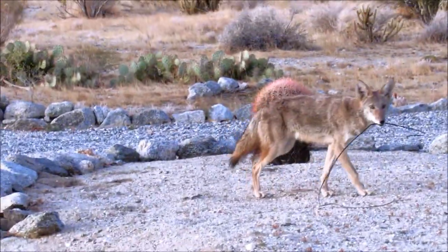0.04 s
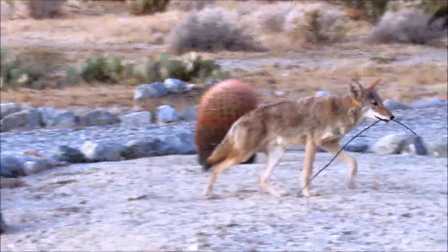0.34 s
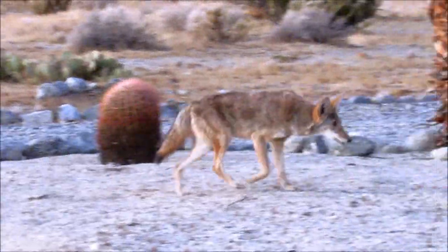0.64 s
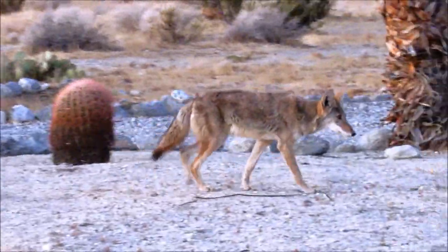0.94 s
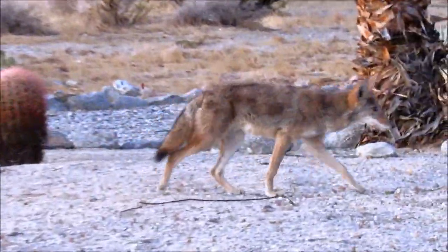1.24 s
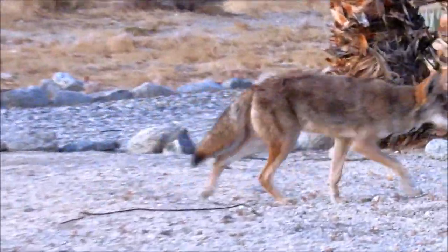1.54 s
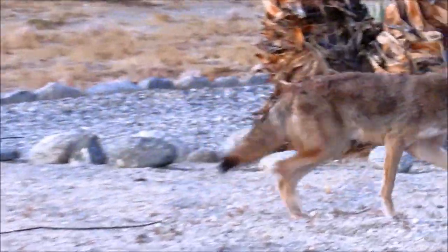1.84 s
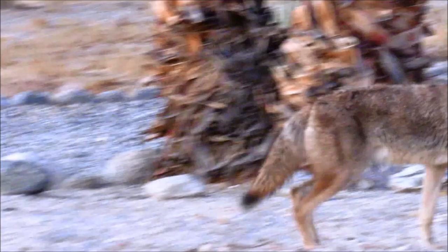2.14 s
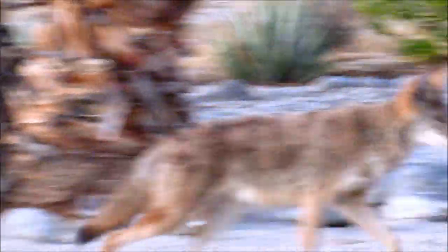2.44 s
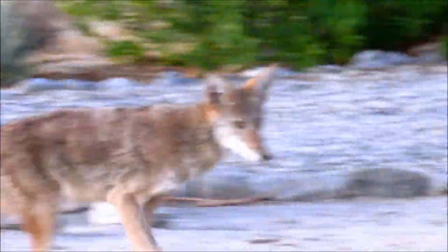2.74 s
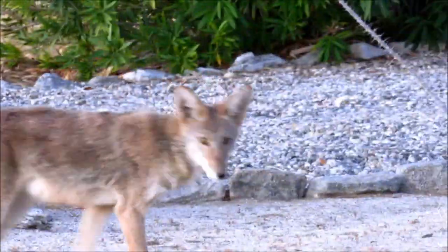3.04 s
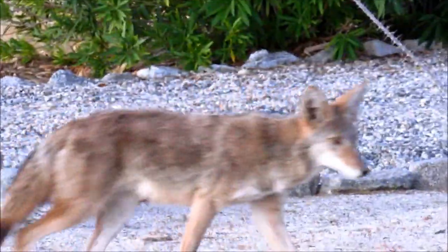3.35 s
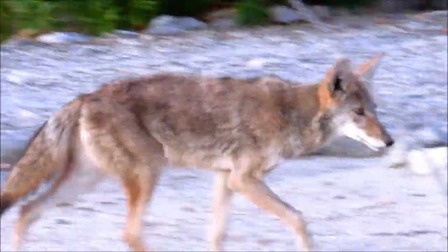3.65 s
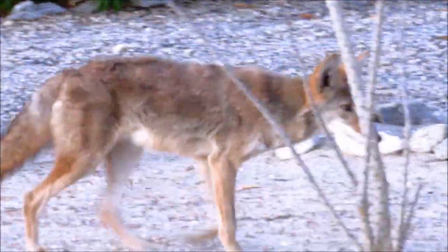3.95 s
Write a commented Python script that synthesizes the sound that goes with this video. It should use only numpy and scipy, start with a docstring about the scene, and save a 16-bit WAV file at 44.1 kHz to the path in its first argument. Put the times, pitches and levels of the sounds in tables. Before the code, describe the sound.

Low gusts of wind hit the microphone in the open air, above a faint far hum. The camera's zoom lever clicks twice and the lens motor buzzes softly for a moment, as the wind builds into heavier, thumping buffets.

```python
"""Outdoors, gusts rumble on a camera's microphone over a faint distant drone, soft rustle and hiss.
Fingers scuff the camera, the zoom lever clicks and rings the plastic casing, and the background dips
briefly. The lens motor rasps into life and whirrs for a second and a half: buzzing gears, a gritty
sliding barrel and a ticking drive. The wind picks up and thumps the microphone, over a faint far hum."""
import sys
import numpy as np
from scipy import signal
from scipy.fft import rfft, irfft
from scipy.io import wavfile
from scipy.ndimage import uniform_filter1d

SR = 44100
rng = np.random.default_rng(int(sys.argv[2]) if len(sys.argv) > 2 else 0)


def unload_audio(sound):
    """Save the sound as a 16-bit wav file, at the path given as the first command line argument."""
    columns = np.transpose(np.atleast_2d(sound))
    # keep every value between -1 and 1, then stretch to whole-number steps
    steps = np.round(np.clip(columns, -1, 1) * 32767)
    wavfile.write(sys.argv[1], SR, steps.astype(np.int16))


N = 176400
T = np.arange(N) / SR
HZ = np.fft.rfftfreq(N, 1 / SR)

# The ride of the gusts. Each row: time in seconds, level in dB.
GUST_LEVEL = [(0.0, -44.5), (0.31, -34.5), (0.46, -43), (0.5, -26.5), (0.57, -48.5), (0.65, -25),
              (0.7, -37), (1.11, -38.5), (1.15, -22), (1.26, -37), (1.45, -28), (1.5, -18.5), (1.64, -29.5),
              (1.85, -24.5), (1.99, -31.5), (2.04, -24), (2.41, -28.5), (2.46, -11.5), (2.53, -23.5),
              (2.7, -25), (2.81, -14), (3.07, -20), (3.99, -19.5)]
# Rumble colour in light and in strong wind. Each row: frequency in Hz, relative level in dB.
LIGHT_RUMBLE = [(28, -6), (65, 9.5), (120, 0), (170, -10), (250, -19.5), (400, -43), (900, -68)]
STRONG_RUMBLE = [(30, -17), (65, -0.5), (115, 2.5), (170, -6), (300, -22.5), (430, -40), (700, -70),
                 (3000, -105)]
# Hard thumps of wind. Each row: centre in seconds, peak in dB, width in seconds.
BUFFETS = [(1.496, -14, .0021), (1.827, -21, 0.0022), (1.868, -21.5, 0.0017), (2.035, -13.5, 0.0025),
           (2.179, -17, 0.0018), (2.461, -15, 0.0024), (2.484, -9.5, .0016), (2.502, -10.5, .0011),
           (2.791, -5, 0.0021), (2.839, -11.5, 0.0016), (2.861, -11.5, .0016), (2.914, -12.5, 0.0014),
           (3.021, -7, 0.0018), (3.115, -9, 0.0017), (3.171, -3.5, 0.0023), (3.241, -13.5, 0.0018),
           (3.293, -3.5, .0015), (3.403, -12.5, 0.0019), (3.485, -11, 0.0014), (3.527, -9, 0.0017),
           (3.583, -4.5, .0016), (3.687, -7.5, 0.0013), (3.716, -12, 0.0013), (3.758, -17, 0.001),
           (3.887, -9, 0.0012), (3.903, -9, 0.0014), (3.972, -6.5, 0.0014)]

# Colours of the background beds. Each row: frequency in Hz, density in dB per Hz before any fader.
AIR_COLOUR = [(100, -82.5), (400, -77), (620, -85), (1000, -92.5), (1400, -96.5), (2000, -108),
              (5000, -120)]
DRONE_COLOUR = [(320, -105), (390, -90), (432, -75.5), (488, -76.5), (550, -89.5), (680, -110)]
RUSTLE_COLOUR = [(600, -115), (1800, -106), (5000, -111), (12000, -122)]
HISS_COLOUR = [(5000, -112), (8000, -107.5), (12500, -107.5), (15000, -112)]
# Stereo image of the air. Each row: frequency in Hz, left-right correlation from -1 to 1.
AIR_IMAGE = [(300, -0.67), (1000, -0.49), (2500, -0.29)]

# Fingers on the casing. Each row: start in seconds, gain in dB.
SCUFFS = [(.706, 3), (.998, -3), (3.292, 0), (3.789, 0)]
# Lever clicks. Each row: start in seconds, level in dB, pitch ratio, tilt in dB per octave.
CLICKS = [(.8675, -43.5, .91, 3), (.9670, -35.5, 1, -.5)]
# Resonances of the casing. Each row: frequency in Hz, bandwidth in Hz, relative level in dB.
CASING_MODES = [(2270, 300, 0), (3100, 350, -12), (4000, 450, -13), (4870, 280, -14.5), (7000, 700, -22)]
# Colours of the camera's noises. Each row: frequency in Hz, density in dB per Hz before any fader.
SCUFF_COLOUR = [(3500, -95), (9000, -106)]
RASP_COLOUR = [(300, -74.5), (700, -80), (1700, -86), (2600, -80), (3500, -95.5), (12000, -106)]
GEAR_LEFT = [(1200, -92.5), (2000, -104), (2450, -97.5), (3000, -94.5), (3500, -102.5), (4550, -109),
             (4870, -94), (5300, -122)]
GEAR_RIGHT = [(1200, -90.5), (2200, -104), (2460, -89), (2700, -100), (3000, -96.5), (3500, -105),
              (4500, -107), (5300, -122)]
BARREL_LEFT = [(5300, -125), (6200, -107), (7800, -104), (8700, -99.5), (9800, -106), (14000, -105),
               (14600, -125)]
BARREL_RIGHT = [(5300, -122), (6200, -104), (7700, -99), (8950, -87), (9450, -93), (9950, -91),
                (11100, -100.5), (12600, -100.5), (14100, -104), (14600, -125)]

# Faders for the rustle, the motor's rasp and the barrel's rub. Each row: time in seconds, gain in dB.
RUSTLE_FADER = [(0, -11), (.5, -3.5), (.9, 4), (2.6, -22), (3.8, 0.5)]
RASP_FADER = [(1.016, -8), (1.038, -3.5), (1.049, 1.5), (1.08, -21)]
BARREL_FADER = [(1.36, 1), (2.06, 1.5), (2.4, -1)]

ZOOM_ON_S, ZOOM_OFF_S = 1.016, 2.603
CYCLE_HZ, FIRST_TICK_S = 19.99, 1.0575  # the rhythm of the lens drive


def amp(db):
    """Decibels to gain."""
    return 10 ** (np.asarray(db) / 20)


def unit(x):
    """Scales to rms 1."""
    return x / np.sqrt(np.mean(x ** 2) + 1e-20)


def curve(points):
    """An automation line through (time, value) points."""
    return np.interp(T, *np.transpose(points))


def spectrum(points):
    """An EQ-style curve through (frequency, value) points on a log-frequency axis."""
    hz, value = np.transpose(points)
    return np.interp(np.log(HZ + 1), np.log(hz), value)


def colour(noise, points):
    """Gives white noise the table's density, rolling off past its ends."""
    low_cut = HZ ** 2 / (HZ ** 2 + (points[0][0] / 2) ** 2)
    high_cut = 1 / (1 + (HZ / points[-1][0] / 1.2) ** 8)
    return irfft(rfft(noise) * amp(spectrum(points)) * low_cut * high_cut, N) * np.sqrt(SR / 2)


def stereo_noise(correlation):
    """White noise whose left-right correlation is one number or a curve over frequency."""
    left, other = rfft(rng.standard_normal((2, N)))
    right = correlation * left + np.sqrt(1 - correlation ** 2) * other
    return irfft(np.array([left, right]), N)


def wander(rate_hz):
    """Random modulation of rms 1, moving at up to about the given rate."""
    return unit(irfft(rfft(rng.standard_normal(N)) / (1 + (HZ / rate_hz) ** 4), N))


def eddies(level_db):
    """Turbulent rumble that brightens as the wind strengthens; the bright part comes in lumps."""
    calm_db, strong_db = -25.5, -9
    strength = np.clip((level_db - calm_db) / (strong_db - calm_db), 0, 1)
    dark = unit(colour(rng.standard_normal(N), LIGHT_RUMBLE))
    bright = unit(colour(rng.standard_normal(N), STRONG_RUMBLE)) * amp(2 * wander(rate_hz=26))
    rumble = np.sqrt(1 - strength) * dark + np.sqrt(strength) * bright
    power = uniform_filter1d(uniform_filter1d(rumble ** 2, size=1500), size=1500)
    levelled = rumble / np.sqrt(power)
    return levelled * amp(level_db + 2 * wander(rate_hz=25.3))


def gusts():
    """Wind on the microphone pushes the two channels mostly in opposite directions."""
    level_db = curve(GUST_LEVEL)
    side = eddies(level_db)
    mid = amp(-13) * eddies(level_db)
    return np.array([mid + side, mid - side])


def distant_air():
    """A wide, dull wash with a fluttering level."""
    return colour(stereo_noise(spectrum(AIR_IMAGE)), AIR_COLOUR) * amp(2.3 * wander(rate_hz=24))


def distant_drone():
    """A narrow band of low-mid noise that sinks about a second in."""
    fader_db = np.interp(T, [.93, 1.02, 4], [0, -6, -9])
    return colour(stereo_noise(.37), DRONE_COLOUR) * amp(fader_db)


def rustle():
    """Soft, finely grained treble that swells and recedes."""
    fader_db = curve(RUSTLE_FADER) + .5 * wander(rate_hz=120)
    return colour(stereo_noise(.4), RUSTLE_COLOUR) * amp(fader_db)


def self_noise(whine_hz=12767, whine_db=-97):
    """The microphone's steady hiss and the camera's thin whine."""
    whine = amp(whine_db) * np.sin(2 * np.pi * whine_hz * T)
    return colour(stereo_noise(0), HISS_COLOUR) + whine


def finger_scuffs(t60_s=.067):
    """Fingers shift on the casing: faint, dry, broad ticks."""
    touch = sum((T > start) * amp(db - 60 * np.maximum(T - start, 0) / t60_s) for start, db in SCUFFS)
    return colour(stereo_noise(0), SCUFF_COLOUR) * touch


def lever_clicks(attack_s=.0007, hold_s=.0032, t60_s=.014, ring_share=.35):
    """The lever scrapes home for a few milliseconds and rings the plastic casing, which dies at once."""
    out = np.zeros((2, N))
    for start, db, pitch, tilt_db in CLICKS:
        age = np.maximum(T - start, 0)
        envelope = np.minimum(age / attack_s, 1) * amp(db - 60 * np.maximum(age - hold_s, 0) / t60_s)
        modes = [(hz * pitch, width, amp(level + tilt_db * np.log2(hz)))
                 for hz, width, level in CASING_MODES]
        body_power = sum(abs(gain * width * HZ / (hz ** 2 - HZ ** 2 + 1j * width * HZ)) ** 2
                         for hz, width, gain in modes)
        scrape = unit(irfft(rfft(stereo_noise(0)) * np.sqrt(body_power), N))
        ring = unit(sum(gain * np.sin(2 * np.pi * (hz * T + rng.random())) for hz, _, gain in modes))
        out += (np.sqrt(ring_share) * ring + np.sqrt(1 - ring_share) * scrape) * envelope
    return out


def brief_dip(from_s=.947, depth_db=-9.5):
    """A gain that ducks around the second click and comes back as the motor starts."""
    ducked = (T > from_s) & (T < ZOOM_ON_S)
    return uniform_filter1d(amp(depth_db * ducked), size=60)


def motor_rasp():
    """The gears rasp as they take up their slack."""
    starting = (T > ZOOM_ON_S) & (T < RASP_FADER[-1][0])
    return colour(stereo_noise(.46), RASP_COLOUR) * amp(curve(RASP_FADER)) * starting


def gear_buzz(teeth, throb):
    """Midrange gear noise pulsing with the teeth, coloured differently on each side."""
    left, right = stereo_noise(.13) * (1 + .21 * teeth + .16 * throb) * amp(wander(rate_hz=25))
    return np.array([colour(left, GEAR_LEFT), colour(right, GEAR_RIGHT)])


def barrel_slide(teeth, throb, peak_specks_per_s=17):
    """The lens barrel rubs with a bright hiss and catches on more grit towards the end of its travel."""
    rub = stereo_noise(.47) * (1 + .21 * throb + .17 * teeth)
    rub *= amp(curve(BARREL_FADER) + .8 * wander(rate_hz=17) + 2 * wander(rate_hz=100))
    travel = (T - ZOOM_ON_S) / (ZOOM_OFF_S - ZOOM_ON_S)
    grit = amp(23.5) * rng.standard_normal((2, N))
    catches = rng.random(N) < travel * peak_specks_per_s / SR
    left, right = rub + grit * catches
    return np.array([colour(left, BARREL_LEFT), colour(right, BARREL_RIGHT)])


def drive_ticks(gap_s=.0167, jitter_s=.00015, ring_hz=12550, width_hz=510):
    """The drive knocks twice a cycle, each knock a tiny high ping far to the right."""
    cycles = np.arange(FIRST_TICK_S, ZOOM_OFF_S, 1 / CYCLE_HZ)
    times = (cycles[:, None] + [0, gap_s]).ravel()
    times += jitter_s * rng.standard_normal(len(times))
    knocks = np.zeros(N)
    knocks[(times * SR).astype(int)] = 1
    knocks *= amp(-41.5 + .5 * rng.standard_normal(N))
    age = T[:SR // 100]
    envelope = (1 - np.exp(-age / .0001)) * np.exp(-np.pi * width_hz * age)
    ping = envelope * np.sin(2 * np.pi * ring_hz * age)
    pan = amp([[-32], [0]])
    return signal.oaconvolve(knocks, ping)[:N] * pan


def zoom_motor(rise_s=.031, fall_s=.0073, throb_lag_s=.0125):
    """One drive moves gears and barrel: six tooth pulses, two throbs and two ticks to a cycle."""
    running = np.clip((T - ZOOM_ON_S) / rise_s, 0, 1) * np.clip((ZOOM_OFF_S - T) / fall_s, 0, 1)
    turn = 2 * np.pi * CYCLE_HZ * (T - FIRST_TICK_S)
    teeth = np.sin(6 * turn)
    throb = -np.cos(2 * (turn - 2 * np.pi * CYCLE_HZ * throb_lag_s))
    return running * (gear_buzz(teeth, throb) + barrel_slide(teeth, throb) + drive_ticks())


def buffets(left_gain=.66, left_lag_s=.00023):
    """Each thump is a single pressure swing, softer, later and opposite in polarity on the left."""
    out = np.zeros((2, N))
    for centre, db, width in BUFFETS:
        offset = (T - centre - np.array([[left_lag_s], [0]])) / width
        out += amp(db) * (1 - offset ** 2) * np.exp(-offset ** 2 / 2)
    return out * [[left_gain], [-1]]


def far_hum(from_s=2.65, centre_hz=926, width_hz=114, level_db=-66.5):
    """A faint, breathy hum of narrow-band noise that fades in late."""
    band = 1 / (1 + (2 * (HZ - centre_hz) / width_hz) ** 2)
    fade_in = np.clip((T - from_s) / .1, 0, 1)
    return unit(irfft(rfft(stereo_noise(0)) * band, N)) * amp(level_db) * fade_in


def scene(edge_s=.012):
    """Wind and background beds share the dip; the handling and lens noises sit on top."""
    edge_fade = np.sin(np.pi / 2 * np.minimum(np.minimum(T, T[::-1]) / edge_s, 1)) ** 2
    wind = (gusts() + buffets()) * edge_fade
    beds = distant_air() + distant_drone() + rustle() + far_hum() + self_noise()
    camera = lever_clicks() + finger_scuffs() + motor_rasp() + zoom_motor()
    return (wind + beds) * brief_dip() + camera


def record(dry, notch_hz=682, notch_width_hz=110, cutoff_hz=15100):
    """The microphone scoops a narrow notch in the mids, and the recorder cuts the extreme top."""
    b, a = signal.iirnotch(notch_hz, notch_hz / notch_width_hz, fs=SR)
    notched = .2 * dry + .8 * signal.lfilter(b, a, dry)
    low_pass = signal.firwin(511, cutoff_hz, window=("kaiser", 9), fs=SR)
    return signal.oaconvolve(notched, low_pass[None], "same")


dry = scene()
out = record(dry)
unload_audio(out)
```